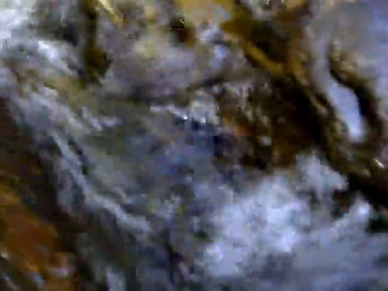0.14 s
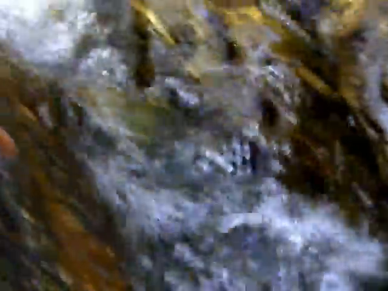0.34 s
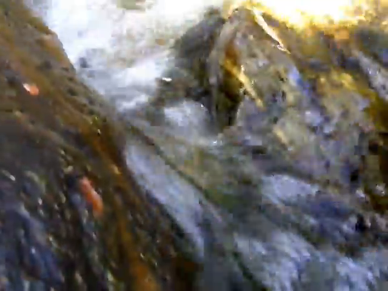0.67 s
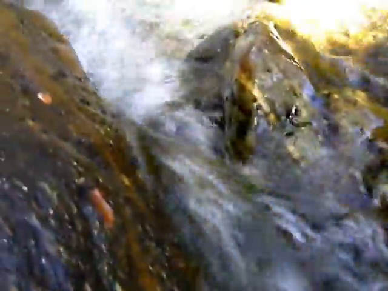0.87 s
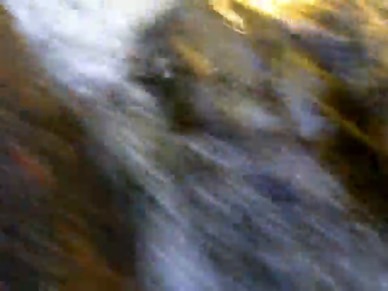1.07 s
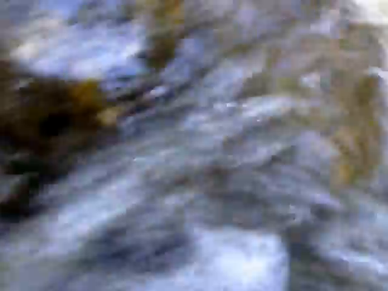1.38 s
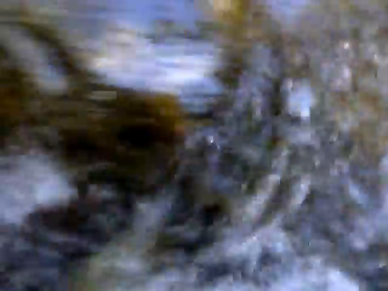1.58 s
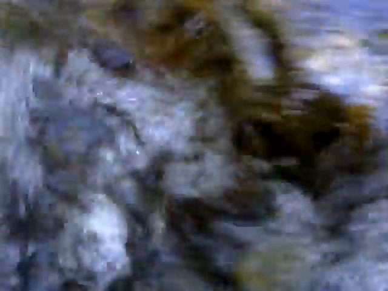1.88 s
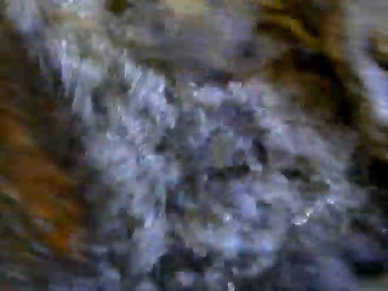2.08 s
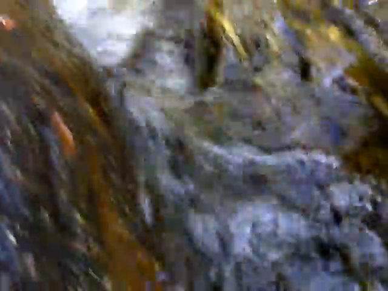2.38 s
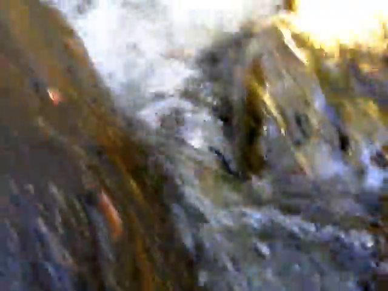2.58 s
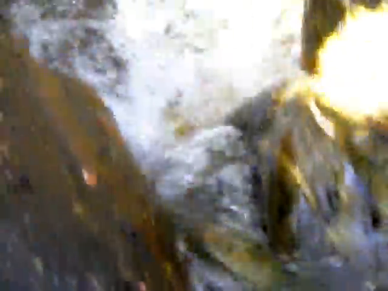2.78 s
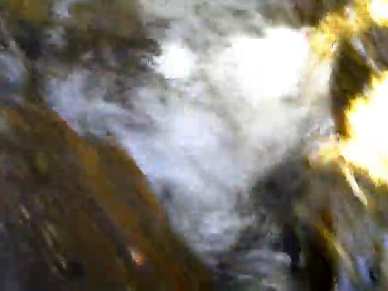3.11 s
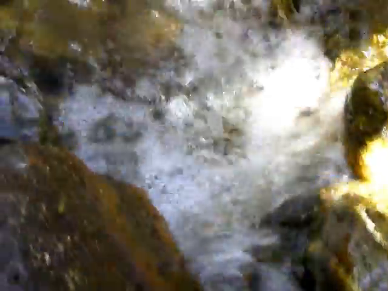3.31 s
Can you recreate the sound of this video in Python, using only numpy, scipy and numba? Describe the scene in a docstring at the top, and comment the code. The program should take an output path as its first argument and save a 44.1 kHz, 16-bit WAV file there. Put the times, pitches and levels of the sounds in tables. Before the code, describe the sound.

A rocky stream gurgles continuously for about 3.4 seconds, already running at the start and cut off still flowing. Hollow, upward-gliding bubbles, mostly around 350 to 900 hertz, crowd over a muffled steady rush. Fuller glugs stand out near 0.1, 0.2, 1.25 and 2.2 seconds; brighter plips cluster around 2. Close, boxy, nearly central stereo, little treble, very faint hiss; singled-out bubbles are somewhat sparser late.

```python
"""White water tumbles over rocks, heard through a waterproof case: the stream is the only source.
Near bubbles of every size are damped sines that glide upward, the loudest placed one by one.
Countless far bubbles merge into a wash of patchy noise. The case rings in a few broad bands
and dulls the treble; two close microphones hear small delays, and their hiss lies on top."""
import sys
import numpy as np
from scipy import signal
from scipy.fft import rfft, irfft, next_fast_len
from scipy.io import wavfile
from scipy.ndimage import uniform_filter1d, map_coordinates
from numba import njit

SR = 44100
rng = np.random.default_rng(int(sys.argv[2]) if len(sys.argv) > 2 else 0)


def invert_db(level):
    """Linear amplitude ratio for a level in decibels (20 dB per decade), elementwise."""
    return 10 ** (np.asarray(level, dtype=float) / 20)


def materialize(psi):
    """Save the field psi as 16-bit PCM at rate SR to the path in sys.argv[1].

    A 1-D psi becomes a single channel; in a 2-D psi each row is a channel.
    """
    bounded = np.clip(np.atleast_2d(psi).T, -1, 1)
    quanta = np.round(bounded * 32767).astype(np.int16)
    wavfile.write(sys.argv[1], SR, quanta)


N = 152145  # length in samples

# Colour of the water through the case.
# Each row: frequency in Hz, relative level in dB per Hz.
CASE_COLOUR = [(20, -45.5), (60, -52.5), (117, -46), (215, -31), (281, -17.5), (372, -5), (422, -0.5),
               (608, -9.5), (687, -4.5), (792, -3), (1210, -21), (1550, -11), (2320, -31), (2900, -32.5),
               (3260, -31), (3700, -41.5), (4500, -42), (5000, -49), (6500, -50.5), (7700, -62.5),
               (9000, -59), (14000, -81)]

SPACING_S = .000043  # typical delay between the microphones
PAN_DB = .5  # typical level difference between them
RISE = .3  # pitch gain over one life, as a share of the starting pitch
# soft start: length in cycles at the given pitch, growing as pitch to a power
ATTACK_CYCLES, ATTACK_HZ, ATTACK_GROWS = .7, 500, .3


def along(points, hz):
    """Reads a curve of (Hz, value) points on a log frequency axis."""
    f, v = np.transpose(points)
    return np.interp(np.log(hz + 1), np.log(f + 1), v)


def unit(x):
    """Scales to rms 1."""
    return x / np.sqrt(np.mean(x ** 2) + 1e-20)


def wobble(rate):
    """A smooth random curve through normal random knots, rate of them a second."""
    knots = rng.standard_normal(int(N * rate / SR) + 4)
    return map_coordinates(knots, [np.arange(N) * rate / SR])


def filtered(x, response):
    """Filters x by a response given as a function of frequency."""
    m = next_fast_len(N + SR // 2)  # spare room for ringing
    return irfft(rfft(x, m) * response(np.fft.rfftfreq(m, 1 / SR)), m)[..., :N]


def causal(points):
    """Minimum-phase response with the gain of the points: it rings after a sound, never before."""
    def response(hz):
        cepstrum = irfft(np.log(invert_db(along(points, hz)) + 1e-6))
        # fold the cepstrum onto positive time
        cepstrum[1:len(hz) - 1] *= 2
        cepstrum[len(hz):] = 0
        return np.exp(rfft(cepstrum))
    return response


def microphone_hiss():
    """Coloured noise, independent in each channel, plus low amplifier noise common to both."""
    # Colour of the hiss. Each row: frequency in Hz, relative level in dB per Hz.
    hiss_colour = [(20, -1.5), (150, -1), (1000, 5.5), (7000, -3.5), (7800, -8), (8800, -4.5),
                   (15800, -5.5)]
    shared_db, shared_hz = 3, 130  # gain and corner of the common noise
    noise = rng.standard_normal((2, N))
    hiss = unit(filtered(noise, lambda hz: invert_db(along(hiss_colour, hz)) * (hz < 16000)))
    rumble = filtered(rng.standard_normal(N), lambda hz: 1 / (1 + (hz / shared_hz) ** 2))
    return hiss + invert_db(shared_db) * rumble


def wash():
    """Far bubbles merge into patchy noise whose channels agree less as the pitch rises."""
    patch_db = 0.63  # rms unevenness over time and frequency
    spectra = signal.stft(rng.standard_normal((2, N)), nperseg=512)[2]
    patches = rng.standard_normal(spectra.shape[1:])
    patches = uniform_filter1d(uniform_filter1d(patches, 10, 0), 10, 1)
    pair = signal.istft(spectra * invert_db(patch_db * unit(patches)), nperseg=512)[1][:, :N]

    def mid_side_gains(hz):
        # the channel correlation that random delays around SPACING_S would give
        correlation = 1 / (1 + (2 * np.pi * hz * SPACING_S) ** 2)
        angle = np.arccos(correlation) / 2
        return np.array([np.cos(angle), np.sin(angle)])

    mid, side = filtered(pair, mid_side_gains)
    return np.array([mid + side, mid - side])


@njit
def pops(n, sr, start, hz, size, cycles, lag, pan, rise, attack):
    """Damped sines of rising pitch, each with its own delay and balance between the microphones."""
    out = np.zeros((2, n))
    for k in range(len(start)):
        for c in range(2):
            t0 = start[k] + (c - .5) * lag[k]
            i0 = int(t0 * sr) + 1
            end = min(i0 + int(2 * cycles[k] / hz[k] * sr), n)  # cut off after two lives
            gain = size[k] * pan[k] ** (c - .5)
            for i in range(max(i0, 0), end):
                u = (i / sr - t0) * hz[k]  # time in cycles of the starting pitch
                life = u / cycles[k]
                envelope = np.exp(-np.pi * life) * (1 - np.exp(-u / attack[k])) ** 2
                out[c, i] += gain * envelope * np.sin(2 * np.pi * u * (1 + rise * life / 2))
    return out


def placed(start, hz, size, cycles, spread):
    """Bubbles from random directions, most near the middle; the later side is the quieter one."""
    side = spread * rng.laplace(size=len(hz))
    attack = ATTACK_CYCLES * (hz / ATTACK_HZ) ** ATTACK_GROWS
    return pops(N, SR, start, hz, size, np.maximum(cycles, 1.0),
                SPACING_S * side, invert_db(-PAN_DB * side), RISE, attack)


def bubble_crowd():
    """Near bubbles in clumps, small ones more numerous, balanced to equal power per hertz."""
    # Level of the fine spray; only the swing about its mean counts.
    # Each row: time in seconds, level in dB.
    spray_curve = [(0.03, -50), (0.08, -55), (0.1, -47), (0.14, -53), (0.18, -50), (0.58, -53),
                   (0.59, -40.5), (0.61, -49.5), (1.44, -50), (1.48, -44.5), (1.51, -55), (1.62, -48.5),
                   (1.62, -54), (1.87, -52), (1.89, -47), (2.17, -52), (2.25, -49.5), (2.49, -51.5),
                   (2.59, -47.5), (2.62, -50), (3.41, -49), (3.42, -50)]
    bubbles_per_s, small_bias = 5000, .8  # count per octave grows as pitch to this power
    low_hz, high_hz = 201.2, 8760  # range of starting pitches
    typical_cycles, cycle_spread = 11.14, 0.37  # life, and its scatter in log units
    size_db, clump_db = 3, 1.2  # scatter per bubble, and shared by neighbours in time
    spatter_db, spatter_hz = 2.2, 2200  # showers of small bubbles, fading in around this pitch

    count = int(bubbles_per_s * N / SR)
    u = rng.uniform(0, 1, (count, 2))
    g = np.clip(rng.standard_normal((count, 2)), -2, 1.4)
    start = u[:, 0] * (N - 1) / SR
    at = (start * SR).astype(int)
    low, high = low_hz ** small_bias, high_hz ** small_bias
    hz = (low + u[:, 1] * (high - low)) ** (1 / small_bias)
    size = hz ** (1 - small_bias / 2) * invert_db(size_db * g[:, 0] + clump_db * wobble(25.02)[at])

    s, spray_db = np.transpose(spray_curve)
    shower_db = np.interp(start, s, spray_db - spray_db.mean())
    shower_db = shower_db + spatter_db * unit(wobble(9) + wobble(21.9))[at]
    size = size * invert_db(shower_db / (1 + (spatter_hz / hz) ** 4))
    return placed(start, hz, size, typical_cycles * np.exp(cycle_spread * g[:, 1]), 1)


def loudest_bubbles():
    """Single bubbles nearly straight ahead, sized to have their level after the case."""
    # Each row: start in seconds, size in dB after the case, starting pitch in Hz, life in cycles.
    glugs = [(0.0177, -14, 644, 10.7), (0.0625, -31.5, 263, 8.1), (0.066, -27.5, 1110, 14),
             (0.0874, 2, 417, 2.9), (0.097, -24, 2860, 8.5), (0.0979, -39, 8372, 9.9),
             (0.102, -30, 6182, 5.7), (0.1044, -30.5, 2599, 18), (0.1356, -13, 374, 12.3),
             (0.1404, -9.5, 834, 10), (0.1711, -10, 468, 8), (0.176, -23, 1530, 12),
             (0.2018, -2.5, 520, 3.9), (0.2122, -10.5, 773, 15), (0.219, -38, 5429, 9),
             (0.2298, -19, 1685, 9.4), (0.2327, -14, 390, 20), (0.2527, -21, 960, 32), (0.295, -47, 135, 4),
             (0.2987, -39, 187, 4.5), (0.307, -19.5, 1355, 14), (0.3502, -7, 810, 9.3),
             (0.3606, -15, 870, 14), (0.4186, -24, 1076, 15), (0.5498, -17, 970, 5.7),
             (0.5601, -7.5, 657, 8.5), (0.5825, -21, 2320, 7.5), (0.584, -18, 1400, 18),
             (0.6167, -21.5, 263, 5.3), (0.642, -11, 523, 9.5), (0.6465, -5.5, 372, 5.8),
             (0.6506, -8, 614, 8.1), (0.6513, -32, 2110, 25), (0.657, -40, 4565, 9),
             (0.6997, -44, 5198, 28), (0.7062, -13, 579, 16.6), (0.7559, -21, 314, 15.5),
             (0.7593, -4, 510, 6.3), (0.765, -44, 7677, 13), (0.8142, -10, 718, 16.6),
             (0.8146, -28.5, 3839, 6), (0.8201, -10.5, 480, 13), (0.8366, -15.5, 960, 18),
             (0.8703, -3, 775, 5.2), (0.92, -29, 2130, 18), (0.967, -19.5, 3220, 7.2),
             (0.9954, -30.5, 2420, 19), (1.012, -8.5, 425, 9.3), (1.014, -11, 796, 10.5),
             (1.024, -6, 466, 9), (1.0806, -14.5, 286, 3.5), (1.094, -22, 2834, 6), (1.0943, -13, 1930, 13),
             (1.118, -12, 607, 5.7), (1.1269, -32.5, 182, 3.3), (1.1548, -24, 244, 4.5),
             (1.1936, -12.5, 808, 16.7), (1.2148, -30.5, 257, 13), (1.2347, -40, 5669, 6),
             (1.248, 2.5, 450, 4.3), (1.2661, -9, 388, 9.2), (1.2793, -23, 1870, 10),
             (1.2787, -29, 1030, 31), (1.2845, -21.5, 453, 12), (1.3042, -11.5, 592, 8.2),
             (1.3239, -18, 308, 7.2), (1.3603, -44, 6456, 25), (1.376, -23, 2850, 8), (1.411, -21, 547, 49),
             (1.4281, -16.5, 1940, 10), (1.4507, -37, 4978, 13), (1.4622, -14.5, 840, 38),
             (1.4673, -9, 410, 20), (1.4799, -34, 2290, 24), (1.483, -15, 1150, 5.4),
             (1.4913, -8, 552, 6.9), (1.5162, -13.5, 409.4, 29), (1.539, -6.5, 750, 5.9),
             (1.55, -26, 293, 9.6), (1.561, -35.5, 3970, 19), (1.5899, -5.5, 467, 7.2),
             (1.5986, -7.5, 640, 5), (1.6037, -36, 2599, 24.5), (1.611, -17.5, 3000, 6.2),
             (1.6123, -13, 597, 7.8), (1.629, -37, 5669, 11), (1.6337, -11, 980, 5.7),
             (1.661, -18.5, 1630, 18), (1.6693, -18, 1080, 7.3), (1.7021, -6, 406, 11.4),
             (1.7322, -33, 4767, 6.7), (1.7454, -11.5, 1430, 6.8), (1.7513, -9, 349, 6.3),
             (1.7629, -26.5, 5530, 7.6), (1.7777, -6.5, 458, 5.2), (1.8, -30.5, 7040, 10.5),
             (1.8257, -15, 584, 26), (1.847, -13.5, 1010, 6.9), (1.906, -13, 1210, 4.1),
             (1.916, -19, 1110, 7.1), (1.9177, -18, 568, 30), (1.9429, -17, 850, 18),
             (1.9538, -28, 2834, 12), (1.971, -10, 854, 14), (1.973, -8, 1770, 4.6),
             (1.9782, -12, 1800, 5.3), (1.9821, -33, 5920, 7.5), (1.984, -41.5, 3830, 26),
             (1.9861, -11.5, 635, 8.5), (1.9955, -5.5, 700, 5), (2.0423, -32, 5920, 6),
             (2.0798, -5.5, 774, 6.3), (2.0958, -28, 867, 16), (2.1028, -7, 1838, 5.4),
             (2.1815, -26.5, 319, 23), (2.204, -14.5, 1330, 7.8), (2.226, 0, 414, 6.2),
             (2.2483, -32, 2100, 19), (2.258, -12, 885, 14), (2.2593, -13.5, 1980, 7.6),
             (2.267, -27, 2160, 8.7), (2.2695, -12, 856, 5.5), (2.2947, -17.5, 534, 28),
             (2.2955, -6, 670, 5.8), (2.3, -8, 402, 6.2), (2.319, -9, 689, 13.5), (2.3356, -13, 880, 16),
             (2.347, -11.5, 1480, 16), (2.347, -38, 5920, 18), (2.3697, -26.5, 333, 33),
             (2.377, -15.5, 1680, 14), (2.3876, -10, 736, 13), (2.4571, -27, 281.6, 25.2),
             (2.4811, -15, 473, 13), (2.495, -29, 1860, 30), (2.525, -25, 2520, 11), (2.535, -45, 167, 4.6),
             (2.553, -14, 455, 20), (2.5611, -21.5, 2760, 6.9), (2.5784, -33, 2770, 12),
             (2.586, -24.5, 2800, 10), (2.599, -5.5, 900, 5.2), (2.611, -21.5, 1140, 11),
             (2.621, -8, 424, 14), (2.6485, -9, 505, 8.4), (2.7095, -15, 634, 12),
             (2.7117, -41.5, 5600, 29), (2.7237, -17, 940, 11), (2.742, -30, 2980, 13),
             (2.7609, -24.5, 232, 3.4), (2.7775, -22.5, 288, 6.1), (2.7914, -15, 835, 9.9),
             (2.887, -12, 750, 5.4), (2.897, -29.5, 3091, 16), (2.9219, -11.5, 601, 14.7),
             (2.9558, -50.5, 122, 4.3), (2.9851, -11.5, 346, 10.7), (3.019, -14, 1000, 5.7),
             (3.0199, -6, 705, 6.4), (3.0604, -29, 2210, 8.7), (3.084, -14.5, 678, 20.4),
             (3.097, -34, 2300, 35), (3.1166, -11, 453, 28), (3.121, -14, 1640, 27),
             (3.137, -12, 494, 11.5), (3.23, -24.5, 286, 12.5), (3.247, -9.5, 707, 5.9),
             (3.2963, -37, 7730, 6), (3.347, -6.5, 1510, 7.1), (3.3888, -6, 520, 6)]
    start, db, hz, cycles = np.transpose(glugs)
    size = invert_db(db - along(CASE_COLOUR, hz))  # makes up for the case at the starting pitch
    return placed(start.copy(), hz.copy(), size, cycles.copy(), .4)


def stream():
    """Crowd and wash follow the flow; the loudest bubbles stand out; the case colours all."""
    # Each row: time in seconds, level of the flow in dB.
    flow_curve = [(0, -22.5), (.5, -23), (1, -23.5), (1.3, -23), (1.4, -25.5), (1.48, -23), (2, -23.5),
                  (2.3, -22.5), (2.8, -24), (3.0, -24), (3.2, -24), (3.45, -23)]
    crowd_db, wash_db = -3.5, -5  # relative to the flow
    surge_db = .4  # small random swell of the flow
    case = causal(CASE_COLOUR)
    s, db = np.transpose(flow_curve)
    flow = invert_db(np.interp(np.arange(N) / SR, s, db) + surge_db * wobble(11.0))
    crowd = invert_db(crowd_db) * unit(filtered(bubble_crowd(), case))
    far = invert_db(wash_db) * unit(filtered(wash(), case))
    return flow * (crowd + far) + filtered(loudest_bubbles(), case)


def scene():
    """The stream alone."""
    return stream()


def low_pass(x):
    """Removes everything above the highest recorded frequency."""
    return signal.sosfilt(signal.butter(12, 15840, fs=SR, output="sos"), x)


def record(dry):
    """Adds the microphone hiss and a small constant offset to the stream."""
    hiss_db, offset = -57.5, -0.0029  # gain of the hiss; offset in full scale
    mix = dry + invert_db(hiss_db) * microphone_hiss() + offset
    return low_pass(mix)


dry = scene()
out = record(dry)
materialize(out)
```